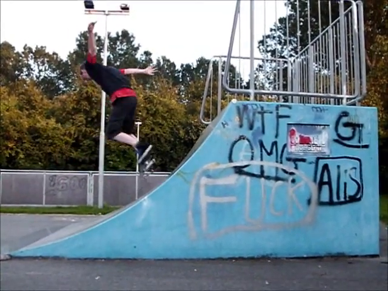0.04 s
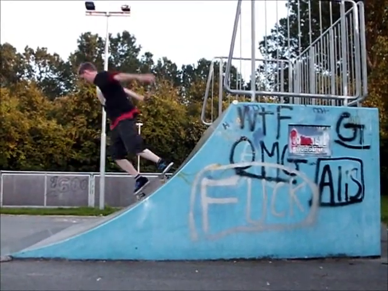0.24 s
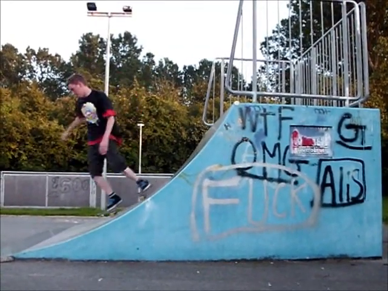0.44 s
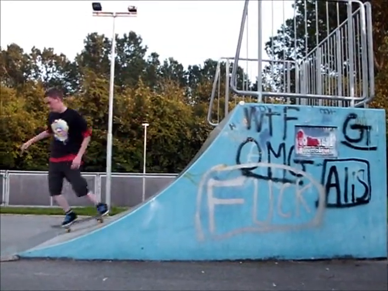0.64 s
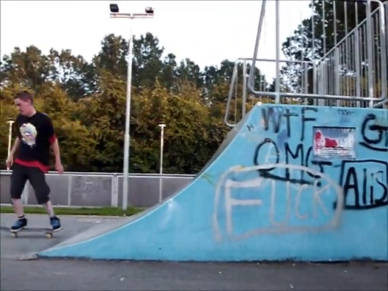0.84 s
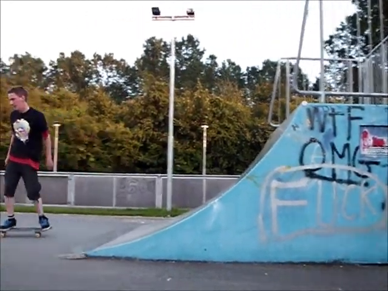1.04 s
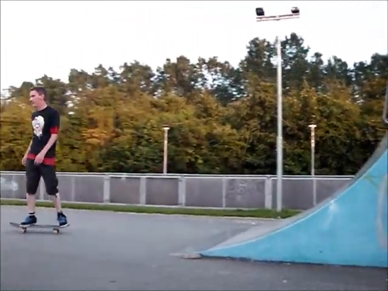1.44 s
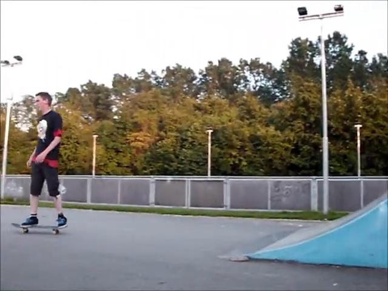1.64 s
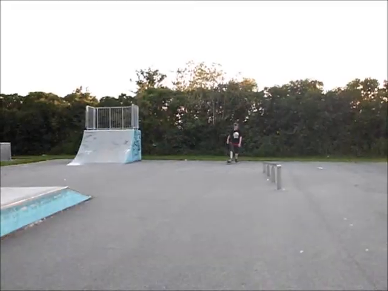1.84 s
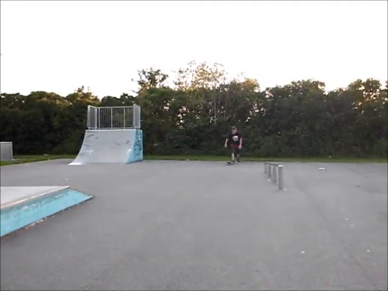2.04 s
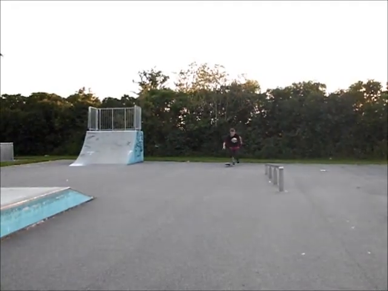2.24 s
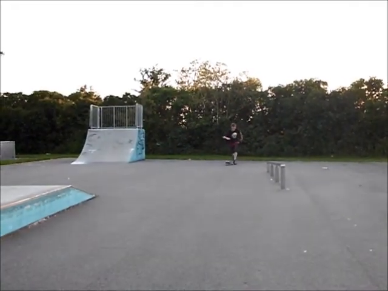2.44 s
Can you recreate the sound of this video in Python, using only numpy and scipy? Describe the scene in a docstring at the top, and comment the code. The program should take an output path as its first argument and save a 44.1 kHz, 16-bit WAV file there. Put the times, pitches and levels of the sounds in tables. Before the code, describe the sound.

At an outdoor skatepark, a nearby skateboard clacks down, its wheels squeaking as it runs down a ramp, bumps onto concrete and rumbles away. The sound cuts briefly, then distant rolling follows, with light wind on the microphone.

```python
"""Skateboard landing on a quarter pipe

In an open-air skatepark, wheels and deck clack down on a hollow ramp and the wheels chirp sideways.
The board rolls down, knocks over the bottom edge and rumbles away on gritty concrete.
After a short silence a board is heard rolling far off. Light wind touches the microphone."""
import sys
import numpy as np
from scipy import signal
from scipy.fft import rfft, irfft
from scipy.io import wavfile
from scipy.ndimage import map_coordinates

SR = 44100
rng = np.random.default_rng(int(sys.argv[2]) if len(sys.argv) > 2 else 0)


def materialize(psi):
    """Save the field psi as 16-bit PCM at rate SR to the path in sys.argv[1].

    A 1-D psi becomes a single channel; in a 2-D psi each row is a channel.
    """
    bounded = np.clip(np.atleast_2d(psi).T, -1, 1)
    quanta = np.round(bounded * 32767).astype(np.int16)
    wavfile.write(sys.argv[1], SR, quanta)


N = 110250
T = np.arange(N) / SR
SILENCE_START_S, SILENCE_END_S = 1.761, 1.8435

# bright hiss of wheels on grit: (frequency [Hz], level [dB])
GRIT_SPECTRUM = [(1500, -9.5), (3000, -11.5), (4800, 1.5), (6000, -0.5), (6700, -4), (7900, 0.5),
                 (9000, -8.5), (10200, -12.5), (12000, -22), (16000, -29.5)]


def from_db(db):
    """Decibels to gain."""
    return 10 ** (np.asarray(db) / 20)


def level(rows):
    """Gain envelope through (time [s], level [dB]) points."""
    return from_db(np.interp(T, *np.transpose(rows)))


def unit_power(x):
    """Scale to an RMS of 1."""
    return x / np.sqrt(np.mean(x ** 2) + 1e-20)


def noise():
    """White noise."""
    return rng.standard_normal(N)


def colour(x, spectrum):
    """Minimum-phase EQ of unit power gain, shaped by (frequency [Hz], level [dB]) points."""
    size = 8192
    hz, db = np.transpose(spectrum)
    bin_hz = np.arange(size // 2 + 1) * SR / size
    shape = from_db(np.interp(np.log(bin_hz + 1), np.log(hz), db))
    cepstrum = irfft(np.log(shape))
    cepstrum[1:size // 2] *= 2
    cepstrum[size // 2 + 1:] = 0
    response = irfft(np.exp(rfft(cepstrum)))
    return signal.fftconvolve(x, response / np.linalg.norm(response))[:N]


def drift(hz):
    """Smooth random modulation of unit power, low-passed at hz."""
    return unit_power(signal.sosfilt(signal.butter(2, hz, fs=SR, output="sos"), noise()))


def waver(x, depth, rate_hz):
    """Let all the resonances of a sound wander up and down together."""
    playhead = np.arange(N) + np.cumsum(depth * drift(rate_hz))
    return map_coordinates(x, [playhead], order=3, mode="mirror")


def decay(start, decay_s):
    """Instant attack, exponential fall."""
    return (T >= start) * np.exp(-np.clip((T - start) / decay_s, 0, 60))


def crunch(bursts):
    """Bursts of tiny contacts from (time [s], level [dB], decay [s])."""
    power = sum((from_db(db) * decay(start, decay_s)) ** 2 for start, db, decay_s in bursts)
    return rng.choice([-1, 1], N) * np.sqrt(power)


def ring(hits, modes, spread_db):
    """Each (time [s], level [dB]) hit rings every mode with a slightly random strength."""
    out, t = np.zeros(N + SR), T[:SR // 2]
    partials = np.array([from_db(db - 60 * t / t60) * np.sin(2 * np.pi * hz * t)
                         for hz, db, t60 in modes])
    for start, db in hits:
        i = int(start * SR)
        out[i:i + len(t)] += from_db(db + spread_db * rng.standard_normal(len(modes))) @ partials
    return out[:N]


def thin_lows(x, low_cut_hz=85):
    """The deepest bass is thinned out."""
    return signal.sosfilt(signal.butter(2, low_cut_hz, "high", fs=SR, output="sos"), x)


def surface_grains(grains_per_s=9000, spread_db=3.5, flutter_db=1.15):
    """Wheels meet a dense run of surface grains, unevenly as they turn."""
    sizes = from_db(spread_db * np.minimum(rng.exponential(1, N), 5))
    polarity = rng.choice([-1, 1], N)
    struck = rng.random(N) < grains_per_s / SR
    return unit_power(sizes * polarity * struck * from_db(flutter_db * drift(hz=26)))


def ticks(rows, decay_s, q, top_hz=11800):
    """Small contacts, each through one resonance, with a softened top."""
    out = 0
    for start, db, hz in rows:
        tick = signal.lfilter(*signal.iirpeak(hz, q, fs=SR), crunch([(start, db, decay_s)]))
        out = out + tick * np.sqrt(q * SR / (np.pi * hz))  # make-up gain for the narrow band
    return signal.sosfilt(signal.butter(4, top_hz, fs=SR, output="sos"), out)


def wind():
    """Light gusts buffet the microphone with a deep rumble."""
    # wind rumble: (frequency [Hz], level [dB])
    spectrum = [(12, 11), (25, -7.5), (62, -1.5), (85, -8.5), (120, -7.5), (170, -17.5), (400, -45),
                (2000, -82)]
    # rise and fall of the gusts: (time [s], level [dB])
    gusts = [(0, -50), (0.15, -48), (0.26, -48.5), (0.6, -49.5), (1.0, -51.5), (1.22, -43.5), (1.4, -49),
             (1.66, -46), (1.71, -46), (1.75, -41), (1.86, -49), (2.5, -52.5)]
    return level(gusts) * colour(noise(), spectrum)


def park_air():
    """A faint, steady bed of open-air noise."""
    # ambience of the park: (frequency [Hz], level [dB])
    spectrum = [(100, -2), (260, 4), (450, -2.5), (1100, 0.5), (1900, -3), (3000, -9), (6000, -8.5),
                (9000, -25), (12000, -41), (16000, -47)]
    return from_db(-60) * colour(noise(), spectrum)


def far_board():
    """Distant wheels give a quiet, grainy roll and a few clacks."""
    # the far board and the park: (frequency [Hz], level [dB])
    spectrum = [(100, 3.5), (200, 3.5), (310, -1), (440, -6), (540, 5), (660, 0.5), (780, -6), (960, -1),
                (1150, 1), (1280, -10), (1450, 2.5), (1670, -5.5), (1850, 1), (2300, -10.5), (2900, -10.5),
                (4000, -9.5), (5000, -0.5), (7000, -4.5), (8000, 0.5), (9500, -12.5), (11500, -25),
                (16000, -30)]
    # distant wheel clacks: (time [s], level [dB], centre [Hz])
    clacks = [(1.953, -53, 1780), (2.033, -49, 1660), (2.162, -51, 1980), (2.187, -53, 1710)]
    return from_db(-54.5) * colour(surface_grains(), spectrum) + ticks(clacks, decay_s=0.0084, q=11)


def scatter(x, t60_s=0.47, build_s=0.0035):
    """A faint tail thrown back by ramp and fences."""
    tail = noise() * from_db(-60 * T / t60_s) * (1 - np.exp(-T / build_s))
    return from_db(-17.5) * signal.fftconvolve(x, tail / np.linalg.norm(tail))[:N]


def bearing_squeaks(width_s=0.0067, fall_hz_per_s=35000, jitter_hz=264):
    """The bearings give thin, unsteady, falling whistles."""
    # squeaks at their peaks: (time [s], pitch [Hz], level [dB])
    squeaks = [(0.426, 9600, -53), (0.523, 10200, -54.5), (0.617, 8260, -48), (0.677, 10260, -46.5),
               (0.783, 6730, -43), (1.141, 10300, -53)]
    out, jitter = 0, jitter_hz * drift(hz=590)
    for peak_s, hz, db in squeaks:
        pitch = hz + jitter - fall_hz_per_s * (T - peak_s)
        swell = np.exp(-np.minimum(((T - peak_s) / width_s) ** 2, 20))
        out = out + from_db(db) * swell * np.sin(2 * np.pi * np.cumsum(pitch) / SR)
    return out


def grit_cracks():
    """Single bits of grit crack under a wheel."""
    # cracking grit: (time [s], level [dB], centre [Hz])
    cracks = [(0.619, -45, 7500), (0.649, -43, 7550), (0.700, -42, 6430), (0.741, -41, 7160),
              (1.0715, -38, 9600), (1.2465, -42, 7000), (1.383, -39, 5200), (2.164, -49, 6200)]
    return ticks(cracks, decay_s=0.0038, q=2.6)


def concrete_roll(hiss_db=-6.5, hiss_swing=0.82):
    """Wheels on concrete: a wavering rumble under a gritty hiss that swells and fades a little less."""
    # rolling on concrete: (time [s], level [dB])
    envelope = [(0.62, -65), (0.775, -50.5), (0.80, -42.5), (0.86, -44), (0.91, -37), (0.98, -42),
                (1.06, -39), (1.15, -44), (1.4, -45.5), (1.76, -47.5)]
    # wheel rumble: (frequency [Hz], level [dB])
    spectrum = [(70, -21), (120, -14.5), (210, -1), (270, -5.5), (320, 0), (372, 2), (415, -4.5),
                (460, -12.5), (555, -2), (605, -4.5), (760, -0.5), (850, -6), (1000, -16.5), (1150, -11.5),
                (1400, -13.5), (1820, -5), (2250, -10), (2900, -30), (12000, -67)]
    force = level(envelope)
    rumble = force * waver(colour(noise(), spectrum), depth=0.018, rate_hz=4)
    hiss_gain = from_db(hiss_db) * force.max() * (force / force.max()) ** hiss_swing
    return rumble + colour(surface_grains() * hiss_gain, GRIT_SPECTRUM)


def ramp_roll():
    """Wheels run down the smooth, hollow ramp, which drones as the curve presses on them."""
    # rolling on the ramp: (time [s], level [dB])
    roll_envelope = [(0, -57.5), (0.03, -52.5), (0.06, -58), (0.16, -65), (0.27, -50), (0.335, -65),
                     (0.41, -47), (0.47, -51.5), (0.58, -51), (0.70, -46), (0.78, -48.5), (0.9, -46.5),
                     (1.0, -72)]
    # wheels on the ramp's skin: (frequency [Hz], level [dB])
    roll_spectrum = [(80, -18.5), (250, -10.5), (480, -9), (620, -1.5), (720, -13), (1000, -9), (1400, -9),
                     (1700, -3), (1920, 2.5), (2200, -4.5), (3100, -19), (3800, -10.5), (6000, -6.5),
                     (7000, -11), (7900, -8), (10000, -15.5), (12000, -29.5), (16000, -31)]
    # swell of the drone: (time [s], level [dB])
    drone_envelope = [(0, -66), (0.14, -68), (0.33, -66.5), (0.45, -64), (0.55, -59.5), (0.72, -50.5),
                      (0.9, -50), (1.0, -93)]
    # the ramp's hollow body: (frequency [Hz], level [dB])
    drone_spectrum = [(50, -21.5), (100, -2), (160, -6.5), (220, -2.5), (265, 2), (320, -8), (450, -17),
                      (3000, -68)]
    roll = colour(surface_grains() * level(roll_envelope), roll_spectrum)
    drone = colour(surface_grains() * level(drone_envelope), drone_spectrum)
    return roll + drone


def edge_knocks(crushed_grit_db=-4.5, impulse_db=-3):
    """A wheel drops over an edge: a bright click, a hollow knock and a short ring of the board."""
    # drops over the ramp's edge and joints: (time [s], click [dB], knock drive [dB], decay [s])
    drops = [(0.7877, -36.5, -34, 0.0054), (0.7916, -25.5, -22.5, 0.002), (0.7952, -53, -23.5, 0.0027),
             (0.8192, -52, -35, .004), (0.826, -39, -34, 0.0042), (0.833, -36, -32, 0.0035),
             (0.885, -28, -27, 0.0016), (0.8911, -37, -31, 0.0036), (0.9030, -37, -39, 0.0038),
             (0.9100, -31.5, -29, 0.0037)]
    # hollow knock: (frequency [Hz], level [dB])
    knock_spectrum = [(80, -24), (180, 1.5), (260, 2.5), (430, -6.5), (560, 4), (780, 1), (1050, -11.5),
                      (1600, 0), (2300, -6.5), (3200, -24.5), (14000, -65)]
    # low modes of the board under the rider's weight: (frequency [Hz], level [dB], t60 [s])
    board_modes = [(192, -16, .07), (251, -14, 0.068), (347, -14, .06), (563, -15, .09), (790, -13, .03)]
    click = crunch([(start, db, decay_s) for start, db, _, decay_s in drops])
    push = from_db(crushed_grit_db) * crunch([(start, db, decay_s) for start, _, db, decay_s in drops])
    for start, _, db, decay_s in drops:
        push[int(start * SR)] += from_db(db + impulse_db) * np.sqrt(decay_s * SR / 2)
    body = ring([(start, db) for start, _, db, _ in drops], board_modes, spread_db=1.0)
    return colour(click, GRIT_SPECTRUM) + colour(push, knock_spectrum) + thin_lows(body)


def skids(fade_s=0.0028, wobble_depth=0.0506, pitch_sag=0.075):
    """A wheel slipping sideways scrapes and sings a brief, sagging note."""
    # wheel slips: (time [s], length [s], pitch [Hz], chirp [dB], scrape [dB])
    slips = [(0.2378, 0.0031, 2200, -22, -23), (0.2453, 0.0036, 1770, -24, -32),
             (0.249, .016, 2066, -25.5, -31), (0.358, 0.023, 1555, -45, -39),
             (0.3826, 0.0053, 1533, -24, -41), (0.3844, 0.012, 1992, -24, -40.5),
             (0.909, 0.006, 2120, -33, -48)]
    # scraping wheel: (frequency [Hz], level [dB])
    scrape_spectrum = [(550, -4.5), (850, -7.5), (1450, 1), (2200, -1.5), (3100, -10.5), (4500, -6),
                       (6300, 3.5), (7500, -4), (9200, -4), (12000, -19.5), (16000, -32)]
    chirps, scrape_gain = 0, 0
    wobble = wobble_depth * drift(hz=276)
    for start, length, hz, chirp_db, scrape_db in slips:
        age = T - start
        attack = np.clip(age / fade_s, 0, 1)
        release = np.exp(-np.clip((age - length + fade_s) / fade_s, 0, 20))
        gate = attack * decay(start, decay_s=8.4) * release
        pitch = hz * (1 + wobble - pitch_sag * np.clip(age / length - 0.5, -1, 1))
        chirps = chirps + from_db(chirp_db) * gate * np.sin(2 * np.pi * np.cumsum(pitch) / SR)
        scrape_gain = scrape_gain + from_db(scrape_db) * gate
    return chirps + colour(scrape_gain * surface_grains(), scrape_spectrum)


def landing():
    """A faint knock from the take-off opens the scene; then every blow of the landing cracks, rings the deck
    and thumps the ramp."""
    # blows: (time [s], crack [dB], crack decay [s], deck ring [dB], ramp thump [dB])
    blows = [(0.001, -50, 0.022, -42.5, -57), (0.1706, -15, 0.0059, -36, -33.5),
             (0.1728, -16.5, 0.0069, -17.5, -44.5), (0.1765, -17, 0.003, -19.5, -25.5),
             (0.183, -23.5, 0.01, -42, -42), (0.1906, -7.5, 0.0018, -26, -31),
             (0.1948, -25.5, 0.011, -30.5, -40), (0.209, -37, .003, -39, -36.5),
             (0.2261, -27, .004, -39, -41), (0.2353, -16, 0.0013, -36, -44),
             (0.2655, -27, 0.0011, -50, -58), (0.3553, -35.5, 0.0011, -44, -70),
             (0.383, -25, 0.0036, -39, -47), (0.3900, -38, 0.0012, -46, -35)]
    # hard contact: (frequency [Hz], level [dB])
    crack_spectrum = [(40, -22.5), (200, -7), (290, 3), (390, -13), (550, 0), (720, 0), (920, -6),
                      (1300, 5), (1650, -2.5), (1900, 3), (2450, 1), (3350, -10.5), (4600, -4), (6100, 2),
                      (7300, -8), (9000, -1.5), (10500, -15), (12500, -22.5), (16000, -30.5)]
    # modes of the deck and trucks: (frequency [Hz])
    deck_pitches = [552, 820, 1045, 1118, 1287, 1371, 1516, 1771, 1927, 2254, 2444, 2740, 3750, 5464, 6076,
                    6301, 8714]
    # ring of each of those modes: (level [dB], t60 [s])
    deck_rings = [(-14, 0.08), (-12, 0.045), (-18.5, 0.16), (-15.5, 0.12), (-1, 0.047), (-14, 0.093),
                  (-13, 0.15), (-9.5, 0.11), (-5.5, 0.052), (-19, 0.18), (-18, 0.075), (-16.5, 0.07),
                  (-14.5, .035), (-11.5, 0.059), (-19, 0.099), (-17, 0.21), (-21, 0.067)]
    # modes of the hollow ramp: (frequency [Hz], level [dB], t60 [s])
    ramp_modes = [(114.7, -8, 0.28), (148, -5, .1), (190, -11, 0.12), (268.5, -14, 0.06), (294.5, -9, 0.09)]
    deck_modes = np.column_stack([deck_pitches, deck_rings])
    crack = crunch([(start, db, decay_s) for start, db, decay_s, _, _ in blows])
    deck = ring([(start, db) for start, _, _, db, _ in blows], deck_modes, spread_db=1.5)
    thump = ring([(start, db) for start, _, _, _, db in blows], ramp_modes, spread_db=1.0)
    return colour(crack, crack_spectrum) + deck + thin_lows(thump)


def scene():
    """The near ride, then the far ride, under light wind."""
    accents = landing() + skids() + edge_knocks() + bearing_squeaks() + grit_cracks()
    near = ramp_roll() + concrete_roll() + park_air()
    rides = np.where(T < SILENCE_START_S, near, far_board())
    return (wind() + rides + accents + scatter(accents))[None]


def record(dry, notch_hz=471, notch_depth=0.62, dc_bias=0.011, cutoff_hz=16000):
    """The microphone scoops the low mids; the sound drops out and pops back; the top is cut steeply."""
    scooped = dry - notch_depth * signal.lfilter(*signal.iirpeak(notch_hz, Q=4, fs=SR), dry)
    sounding = (T < SILENCE_START_S) | (T >= SILENCE_END_S)
    pop = from_db(-36) * decay(SILENCE_END_S, decay_s=0.097)
    high_cut = signal.ellip(12, 0.1, 90, cutoff_hz, fs=SR, output="sos")
    return signal.sosfilt(high_cut, (scooped + dc_bias) * sounding + pop)


dry = scene()
out = record(dry)
materialize(out)
```